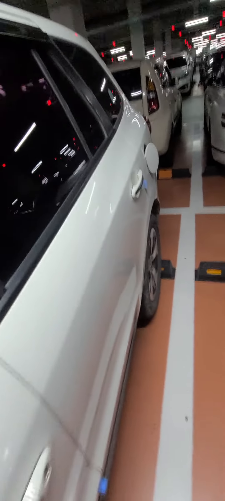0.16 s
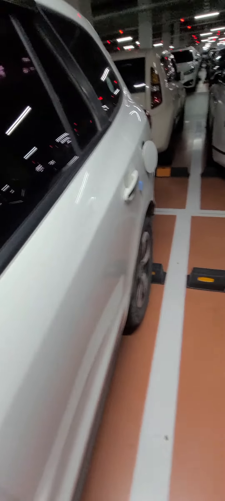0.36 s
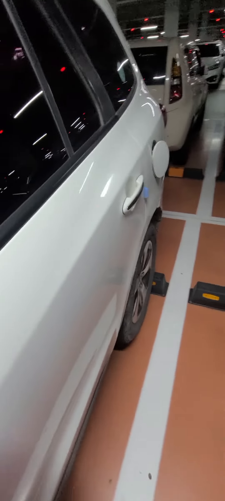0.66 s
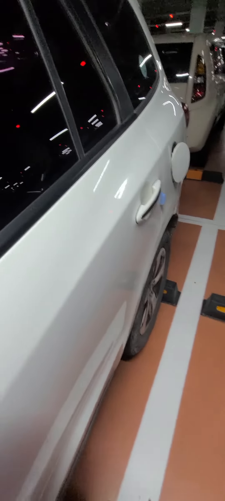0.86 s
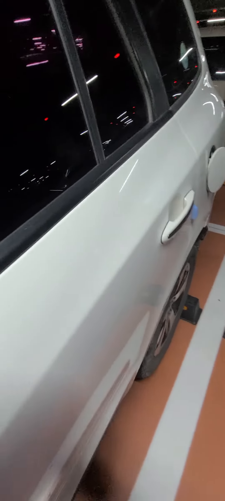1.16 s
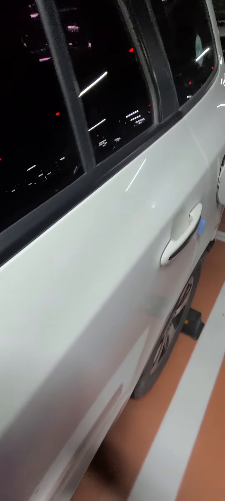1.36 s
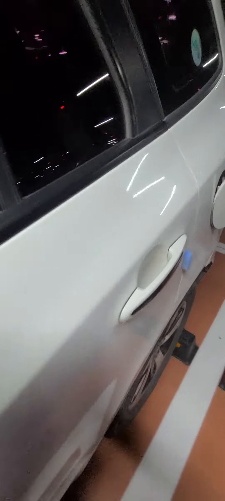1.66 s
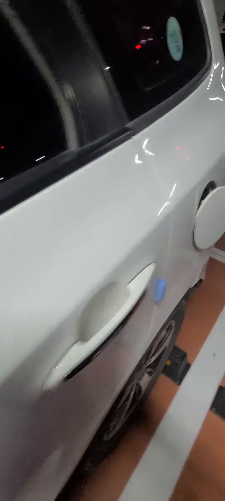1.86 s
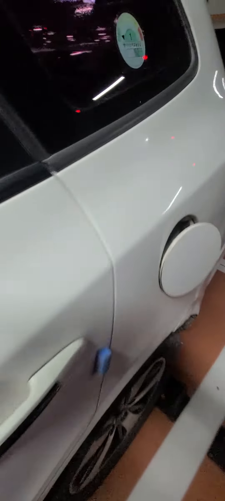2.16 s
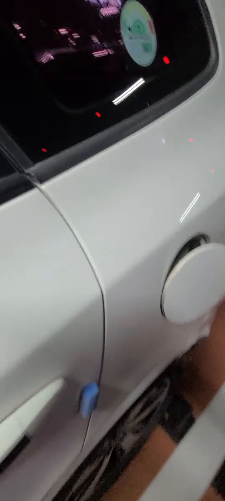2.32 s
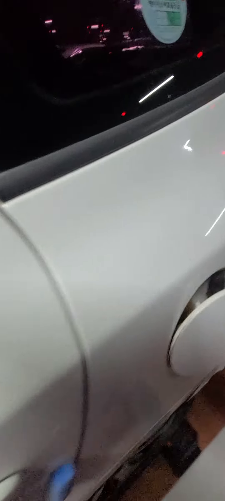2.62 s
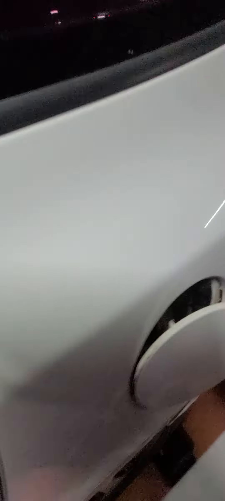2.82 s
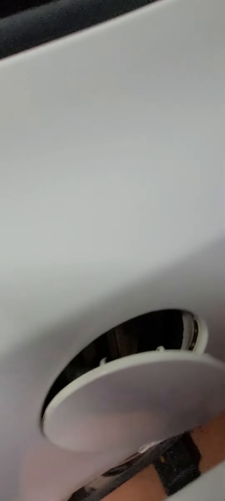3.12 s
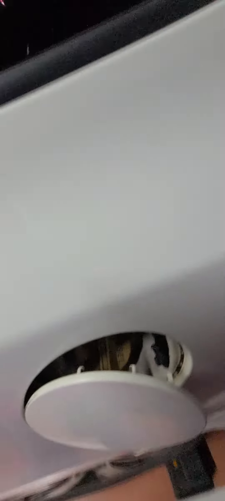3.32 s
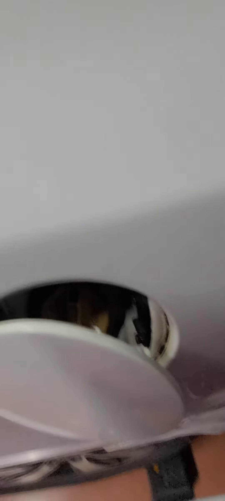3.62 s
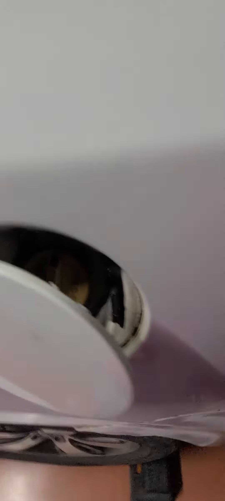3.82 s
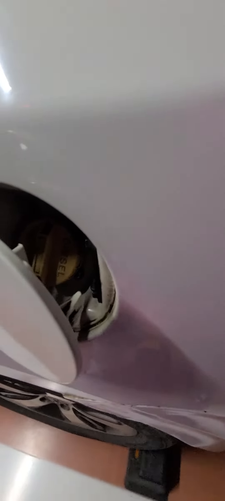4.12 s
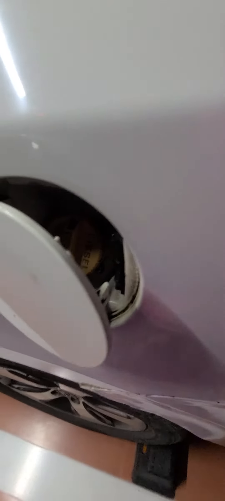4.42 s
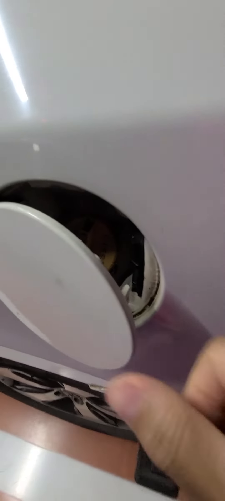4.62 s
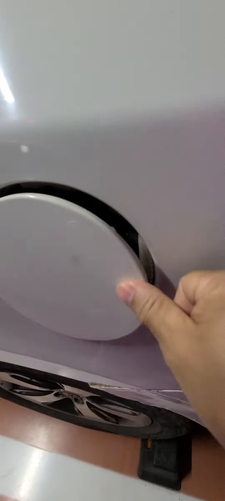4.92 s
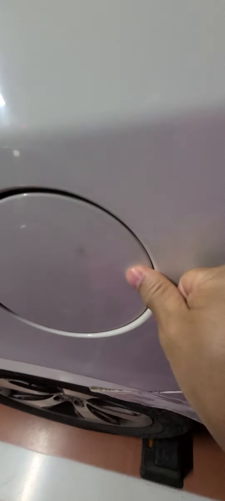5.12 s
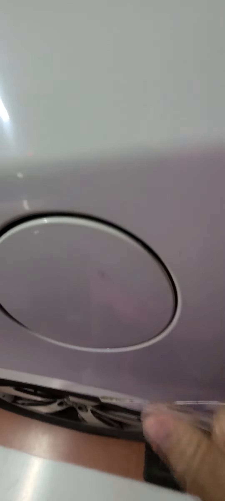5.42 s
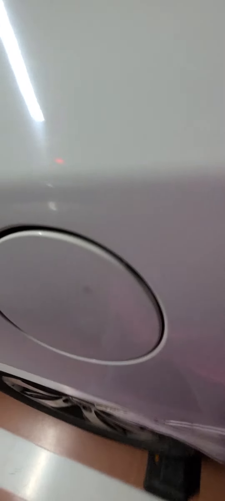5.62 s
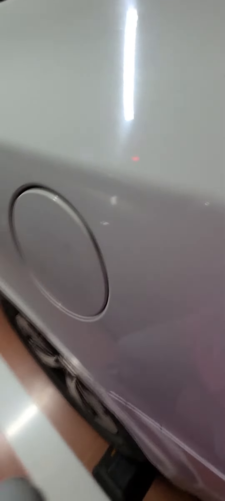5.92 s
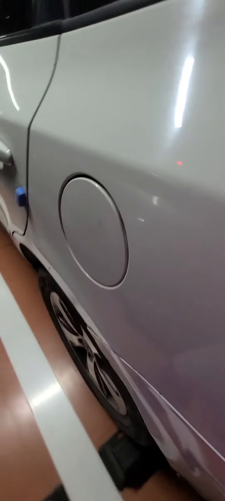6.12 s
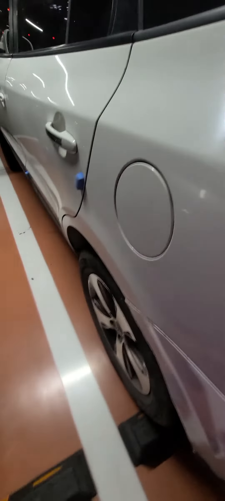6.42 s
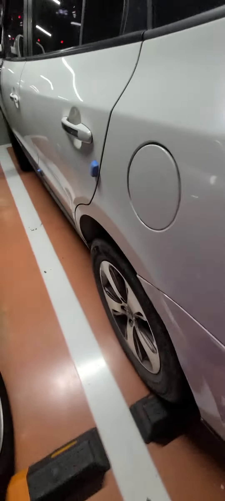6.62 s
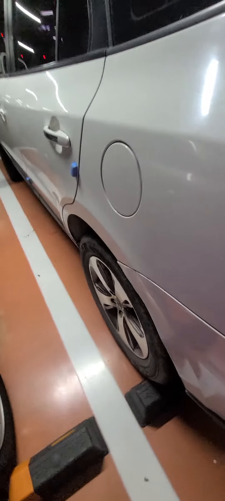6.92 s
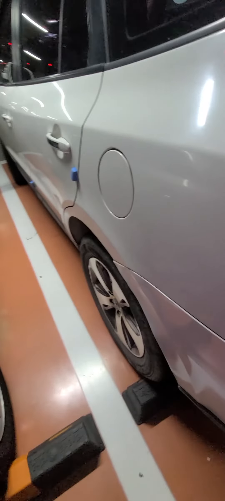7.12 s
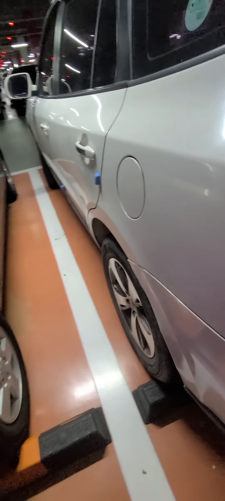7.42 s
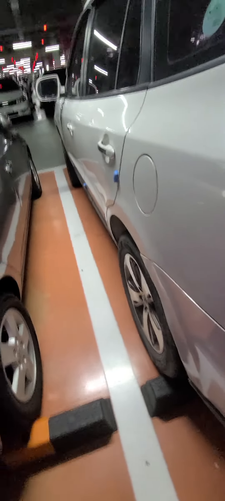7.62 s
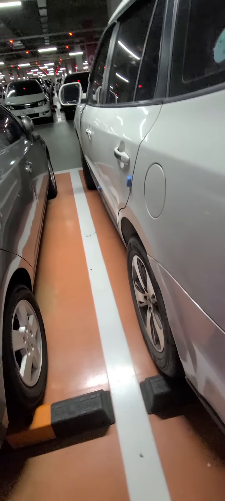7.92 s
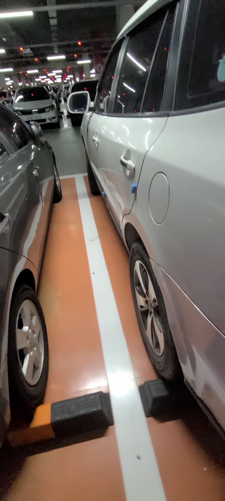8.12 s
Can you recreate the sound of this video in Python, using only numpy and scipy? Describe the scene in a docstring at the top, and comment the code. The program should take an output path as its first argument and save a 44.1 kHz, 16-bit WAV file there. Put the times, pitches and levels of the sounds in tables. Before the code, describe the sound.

In a concrete parking garage with a faint ventilation hum, someone moves beside a car, their jacket rubbing and crackling in irregular strokes near the microphone. The car's body is bumped twice with loud, hollow knocks. A fuel flap is then pushed closed with a sharp double clack, followed by a short shoe squeak, lighter swishes and a soft footfall, with dull handling thuds throughout.

```python
"""Edging along a parked car

A jacket swishes by sliding friction and crinkles as its creases buckle, close to a handheld camera.
Two bumps excite the modes of the car's side panel; a thumb snaps the fuel flap shut and lets it spring
back, and a rubber sole hoots. Ventilation hums; handling, footfalls and the panel add low thuds. The
concrete garage reverberates, and a limiter flattens the loudest knocks."""
import sys
import numpy as np
from scipy import signal
from scipy.fft import rfft, irfft, next_fast_len
from scipy.io import wavfile
from scipy.ndimage import uniform_filter1d, minimum_filter1d, map_coordinates

SR = 44100
rng = np.random.default_rng(int(sys.argv[2]) if len(sys.argv) > 2 else 0)


def waveform_to_disk(signal):
    """Save audio, clipped to [-1, 1], as 16-bit WAV at the path in sys.argv[1]."""
    frames = np.transpose(np.atleast_2d(signal))
    scaled = np.clip(frames, -1, 1) * 32767
    samples = np.round(scaled).astype(np.int16)
    wavfile.write(sys.argv[1], SR, samples)


N = 364266

# Levels in the tables are relative; a positive right bias favours the right channel.
# jacket sliding on itself: (time at full speed [s], hold [s], level [dB], rise [s], fall [s],
# fizz over swish [dB])
STROKES = [(0.0, 0.01, -52.5, .2, 0.24, -16.5), (0.47, 0.15, -52, .25, 0.093, -14),
           (0.988, .06, -40, 0.14, 0.18, -16.5), (1.27, .11, -42.5, .22, .17, -17),
           (1.922, .13, -42.5, .28, .25, -13), (2.364, 0.26, -50.5, .15, .3, -13),
           (2.713, .02, -47, .2, 0.098, -11), (2.873, .05, -48, 0.16, .35, -9.5),
           (3.215, .1, -42.5, .34, .2, -7.5), (3.741, .25, -47.5, 0.55, 0.39, -8),
           (4.423, .11, -57, 0.21, .16, -8.5), (4.796, 0.015, -60.5, .07, 0.11, -11.5),
           (5.126, .1, -62, .12, 0.09, -12), (5.489, .21, -57, 0.28, 0.33, -7),
           (5.81, 0.14, -48.5, 0.14, .07, -8.5), (6.238, .04, -42.5, .24, .32, -10.5),
           (6.595, 0.1, -50.5, .2, .3, -9), (6.907, .14, -59, .3, 0.073, -4.5),
           (7.414, 0.29, -56, .45, .25, -12), (8.09, .03, -52.5, 0.16, .24, -13.5)]
# ribbed cloth rasping: (time at full speed [s], hold [s], level [dB], rise [s], fall [s])
RASPS = [(0.467, 0.014, -42.5, 0.12, 0.22), (1.981, .125, -39, 0.12, .06), (3.256, .07, -39, 0.09, .14),
         (6.616, 0.059, -55.5, .08, 0.17)]
# heavy, hollow drags of the sleeve: (time at full speed [s], hold [s], level [dB], rise [s], fall [s])
DRAGS = [(1.065, 0.15, -51.5, .16, 0.16), (1.896, .03, -58.5, .3, 0.52), (7.2, 0.0198, -65, .08, 0.198)]
# the weave whistling, one list a stroke: (time [s], pitch [Hz], level [dB])
WHISTLES = [
    [(0.535, 1063, -61), (0.565, 1198, -33), (0.585, 1270, -48), (0.6, 1290, -57)],
    [(3.07, 11990, -65), (3.15, 12890, -57), (3.22, 14700, -52), (3.25, 14460, -57)],
    [(3.29, 4410, -42), (3.31, 5845, -36.5), (3.328, 6850, -41), (3.345, 6760, -71)],
    [(6.79, 6390, -58), (6.798, 6550, -37.5), (6.81, 6500, -65)],
    [(8.14, 7140, -67), (8.19, 6900, -61), (8.22, 7100, -60), (8.26, 6700, -69)],
]
# creases popping, with a soft footfall and a faint shoe squeak near the end:
# (time [s], knock [dB], crack [dB], resonance [Hz], right bias [dB])
POPS = [(0.1526, -40, -46, 2840, 3.5), (0.3853, -42.5, -43.5, 2780, 5.5), (0.513, -45.5, -41.5, 1990, 25),
        (1.2049, -40, -53, 1177, 13.5), (1.2392, -44, -42, 6800, 15), (1.3784, -32.5, -38, 1350, 15),
        (1.461, -41.5, -38.5, 3180, 12), (1.5566, -41.5, -40.5, 1950, 13), (1.6726, -44.5, -39, 3260, 9.5),
        (1.7581, -28, -30.5, 1296, 6.5), (1.8013, -32.5, -52, 1010, 7), (1.8393, -34.5, -32.5, 3460, 8.5),
        (1.8793, -33, -44.5, 897, 11.5), (1.9024, -29.5, -13.5, 3460, 3), (1.9093, -29, -40.5, 1330, 8.5),
        (2.3422, -36.5, -48, 970, 11.5), (2.3711, -29.5, -20, 3120, 6), (2.3748, -27, -18, 2083, 5),
        (2.4479, -27, -32, 3266, 7.5), (2.463, -34, -55, 916, 1.5), (2.6423, -37.5, -42, 1250, 9),
        (2.7195, -33, -42, 1180, 13), (2.7441, -35, -35.5, 1479, 9), (2.8769, -48.5, -34, 2728, 5.5),
        (2.8821, -34, -33.5, 2760, 9), (2.8947, -44, -31.5, 2800, 16.5), (2.9165, -32, -44, 1200, 0),
        (2.9223, -23, -20, 3106, 10.5), (3.0364, -37.5, -48.5, 1575, 10),
        (3.0928, -31.5, -39.5, 1310, 14.5), (3.122, -36.5, -40.5, 1240, 7), (3.3545, -33, -31.5, 2900, 5),
        (3.372, -25.5, -26.5, 1925, 16.5), (3.3864, -30, -22, 4800, 1.5), (3.3955, -40, -22.5, 1680, 29),
        (3.5022, -27, -25, 1520, 2), (3.514, -32.5, -29, 4335, 0.5), (4.0406, -34, -43.5, 1603, 11),
        (4.1141, -43, -47.5, 1730, 8.5), (6.5063, -47.5, -54.5, 7160, 11), (6.7418, -69, -51, 6420, 4),
        (6.7969, -60, -51.5, 6900, 1), (7.0255, -54.5, -70, 2696, 7), (7.1502, -47.5, -49.5, 1406, 14),
        (7.1873, -52.5, -63, 993, 0), (7.6854, -43, -38.5, 5200, 12), (7.7442, -32.5, -33, 1210, 11),
        (7.8365, -52, -56.5, 1475, 10), (7.9641, -53, -58, 1395, 5)]
# low thuds from handling, footfalls and the bumped car panel: (time [s], level [dB])
THUDS = [(0.1, -63), (1.24, -50.5), (1.77, -52), (1.91, -50), (2.45, -60), (2.72, -50.5), (2.92, -46),
         (3.1, -38.5), (3.37, -45.5), (3.51, -46.5), (4.04, -50), (4.37, -47.5), (5.17, -43.5),
         (5.39, -48.5), (5.94, -53), (6.51, -62), (7.18, -54), (7.68, -61)]
# side panel modes: (frequency [Hz], t60 [s], level at first spot [dB], level at second spot [dB])
PANEL_MODES = [(79, 0.19, -37, -36.5), (108, 0.25, -32, -28), (126, 0.28, -25.5, -21.5),
               (174, 0.31, -28.5, -23.5), (228.4, 0.28, -22, -22.5), (269.2, 0.17, -15, -19.5),
               (313.5, 0.22, -9.5, -11), (339, 0.062, -5, -4), (401, 0.11, -15, -9.5),
               (432, 0.13, -12.5, -7.5), (472, 0.2, -7.5, -2.5), (502, 0.084, -11.5, -10),
               (532, 0.19, -12, -18.5), (643, 0.039, -20, -32), (753, 0.081, -21, -36),
               (856, 0.084, -28, -26)]
# blows on the panel, one list a spot: (time [s], strength [dB], t60 factor [1], cut-off [Hz])
PANEL_BUMPS = [
    [(3.587, 4, 0.89, 3000)],
    [(4.2735, -16, 0.97, 2940), (4.2845, 2, 1, 3000)],
]
# hard contacts on panel and catch: (time [s], knock [dB], crack [dB], resonance [Hz], right bias [dB])
CONTACTS = [(3.579, -20.5, -21.5, 3060, 7.5), (3.5835, -27, -19, 1450, 2), (3.5895, -18.5, -22, 2950, 3),
            (3.6414, -23.5, -19, 2153, 7), (4.2726, -30.5, -39.5, 2942, -1), (4.2845, -37, -30.5, 6630, -1),
            (4.3012, -37, -33, 3130, 0.5), (4.314, -39.5, -42, 3080, 5), (4.8318, -49.5, -66, 2462, 6),
            (4.9255, -51, -48, 1800, 3), (4.9593, -42, -58, 1740, 9.5), (5.0374, -24, -32, 3600, 1),
            (5.0433, -29, -39.5, 1360, 1.5), (5.158, -28.5, -41, 3700, 2),
            (5.1662, -12.5, -30.5, 1150, -0.5), (5.175, -18.5, -31, 3870, 0), (5.3629, -55, -49, 1420, -1)]
# fuel flap modes: (frequency [Hz], t60 [s], level at catch [dB], level at spring stop [dB])
FLAP_MODES = [(125, 0.3, -30, -28), (185.2, 0.42, -27, -26.5), (218, 0.21, -27.5, -28),
              (262, 0.16, -16, -32.5), (306.4, 0.2, -15.5, -29.5), (383, 0.12, -10.5, -35.5),
              (421.5, 0.33, -14, -21.5), (453.7, 0.22, -17, -8), (510, 0.071, -6, -18),
              (571, 0.028, -5, -15), (631, 0.1, -14.5, -19), (704, 0.15, -12.5, -44),
              (841, 0.048, -10, -36.5), (1130, 0.042, -24.5, -25), (1312, 0.11, -22, -51),
              (1440, 0.13, -25, -37), (1680, 0.16, -24.5, -39)]
# blows at the catch, then at the stop: (time [s], strength [dB], t60 factor [1], cut-off [Hz])
FLAP_PUSHES = [
    [(5.038, -14.5, 0.8, 490), (5.129, -18.5, 0.94, 448), (5.166, 2, 0.8, 2455)],
    [(5.336, -15, 0.76, 600), (5.366, -0.5, 0.42, 1266)],
]
# rubber sole modes: (frequency [Hz], t60 [s], level [dB])
SOLE_MODES = [(327, 0.096, -12.5), (647, 0.045, -18)]
# its scuff on the painted floor: (time [s], strength [dB], t60 factor [1], cut-off [Hz])
SOLE_SCUFFS = [
    [(6.139, 0.0033, 0.98, 2030)],
]
# spectral envelopes of the noises: (frequency [Hz], level [dB])
SWISH_SPECTRUM = [(120, -42), (200, -12), (418, -6), (505, -5.5), (649, -7.5), (783, -3), (888, -7.5),
                  (1200, -1), (1540, -3), (1740, -1), (1980, -5.5), (3160, -1.5), (4070, -7), (6930, -7.5),
                  (8500, -25.5), (11000, -47.5), (18700, -120)]
FIZZ_SPECTRUM = [(6000, -47), (7800, -1), (9500, -1), (11200, 1), (13000, -1), (15000, -5.5), (16500, -4.5)]
VENTILATION_SPECTRUM = [(15, -33), (25, 3.5), (97, -6), (229, -4.5), (624, -10.5), (695, -12),
                        (1040, -16.5), (1260, -18.5), (1840, -23), (2990, -19.5), (5140, -29),
                        (6380, -10.5), (8140, -27), (12500, -29), (16000, -34)]
RUMBLE_SPECTRUM = [(15, -14), (40, -7.5), (80, 3.5), (130, -8), (250, -16.5), (600, -52.5)]
POP_SPECTRUM = [(50, 19), (110, 18.5), (210, 6), (430, 13), (720, 6), (1200, 9), (2000, 4.5), (3300, 3.5),
                (4500, 1.5), (5500, -10.5), (7000, -3), (8300, -21), (12000, -19), (16000, -26.5)]
CLICK_SPECTRUM = [(50, 20.5), (2000, 0.5), (3300, -3), (5200, -8.5), (7200, -7), (8300, -11.5),
                  (9800, -12.5), (12000, -20), (16000, -25.5)]
# likeness of left and right: (frequency [Hz], coherence [1])
AIR_COHERENCE = [(60, 0.63), (300, 1), (900, 0.22), (2500, 0.091), (12000, 0.042)]
CLOTH_COHERENCE = [(200, .8), (1000, 0.45), (4000, 0.1), (14000, 0.37)]
# reverberation time of the garage: (frequency [Hz], t60 [s])
HALL_T60 = [(100, 1.8), (450, 0.96), (1500, 0.61), (5000, 0.21), (14000, 0.3)]
# thud, knock, crack and tick bands of a snap: (lower edge [Hz], upper edge [Hz])
SNAP_BANDS = [(50, 250), (250, 1200), (1200, 4500), (4500, 16000)]

TOP_HZ = 16100


def amp(db):
    """Amplitude ratio of a level in decibels."""
    return 10 ** (np.asarray(db) / 20)


def unit(x):
    """Normalisation to rms 1."""
    return x / np.sqrt(np.mean(x ** 2) + 1e-20)


def along(points, hz):
    """Interpolation on a logarithmic frequency axis."""
    knots_hz, values = np.transpose(points)
    return np.interp(np.log(hz + 1), np.log(knots_hz + 1), values)


def wobble(rate):
    """Smooth random modulation, with rate knots a second."""
    return map_coordinates(rng.standard_normal(int(N * rate / SR) + 4), [np.arange(N) * rate / SR])


def filtered(x, response):
    """Linear filtering: the spectrum is multiplied by a frequency response."""
    n = x.shape[-1]
    padded = next_fast_len(n + 8192)
    return irfft(rfft(x, padded) * response(np.fft.rfftfreq(padded, 1 / SR)), padded)[..., :n]


def add(track, start_s, sound):
    """Superposition of a sound on a track."""
    part = track[..., max(round(start_s * SR), 0):][..., :sound.shape[-1]]
    part += sound[..., :part.shape[-1]]


def together(gains):
    """Incoherent sources add in power."""
    return np.sqrt(sum(gain ** 2 for gain in gains))


def stereo_noise(spectrum, coherence):
    """Partially coherent noise of rms 1: the ratio of mid to side sets the coherence."""
    angle = lambda hz: np.arccos(np.clip(along(coherence, hz), -1, 1)) / 2
    shape = lambda hz: amp(along(spectrum, hz)) * [np.cos(angle(hz)), np.sin(angle(hz))]
    mid, side = filtered(rng.standard_normal((2, N)), shape)
    return unit(np.array([mid + side, mid - side]))


def narrow_band(centre_hz, width_hz):
    """Quadrature modulation shifts low-pass noise to a fixed or moving centre."""
    skirt = [(width_hz / 4, 0), (width_hz / 2, -3), (width_hz * 2, -22), (width_hz * 10, -70)]
    in_phase, quadrature = (stereo_noise(skirt, coherence=[(100, 0.23)]) for _ in range(2))
    phase = 2 * np.pi * np.cumsum(np.broadcast_to(centre_hz, N)) / SR
    return in_phase * np.cos(phase) + quadrature * np.sin(phase)


def placed(x, lag_ms, right_db):
    """Time and level differences: a source on the right reaches the left channel later and weaker."""
    side = np.array([[-1], [1]])
    delay = lambda hz: np.exp(1j * np.pi * hz * lag_ms / 1000 * side)
    return filtered(x, delay) * amp(right_db / 2 * side)


def swell(time, hold, db, rise, fall):
    """Friction noise grows as speed to the power 1.5, holds, then loses 20 dB per fall time."""
    t = np.arange(N) / SR - time
    speed = np.clip(1 + t / rise, 0, 1)
    fading = np.clip((t - hold) / fall, 0, 10)
    return speed ** 1.5 * amp(db - 20 * fading)


def snaps(rows, spectrum, bands, t60s, tick_db, tail_db, tail_t60, spread, ring_db, upper_db, lead_db):
    """Sudden release: a brief slide, then a noise burst with two resonances, its low bands dying last."""
    out = np.zeros((2, N))
    t = np.arange(4096) / SR - 0.012
    after = np.maximum(t, 0)
    times, knock, crack, ring_hz, right_bias = np.transpose(rows)
    thud = knock - 16
    tick = crack + tick_db + 0.0036 * ring_hz  # the higher it rings, the sharper it is
    levels = [thud, knock, crack, tick][-len(bands):]
    peak = lambda hz: 1 / (1 + ((hz / ring_hz[:, None, None, None] - 1) / 0.1) ** 2)
    colour = lambda hz: amp(along(spectrum, hz) + ring_db * peak(hz) + upper_db * peak(hz / 1.45))
    noise = rng.standard_normal((len(rows), len(bands), 3, len(t)))  # left, right, common
    slips = amp(3.3 * rng.standard_normal((len(rows), 1, 1, len(t))))  # a few micro-slips stand out
    noise = filtered(slips * (noise[:, :, :2] * spread + noise[:, :, 2:]), colour)
    slide = amp(lead_db - 60 * np.abs(t) / 0.055)
    onset = 1 - np.exp(-after / 0.00039)
    tail = amp(tail_db - 60 * after / tail_t60)
    for k, (band, t60) in enumerate(zip(bands, t60s)):
        envelope = (amp(-60 * after / t60) + tail) * onset + slide
        bandpass = signal.butter(2, band, "band", fs=SR, output="sos")
        bursts = signal.sosfilt(bandpass, noise[:, k] * envelope)
        for time, db, right_db, burst in zip(times, levels[k], right_bias, bursts):
            balance = unit(amp([[0], [right_db]]))
            rms = np.sqrt(np.sum(burst ** 2) / (2 * 0.01 * SR))  # energy referred to 10 ms
            add(out, time + t[0], amp(db) * balance * burst / rms)
    return out


def struck(modes, blows, attack_s, scatter_db, drift):
    """Modal superposition: the point of impact weights the damped modes; one track a point."""
    out = np.zeros((len(blows), N))
    t = np.arange(SR // 2) / SR
    hz, t60, *spots = np.transpose(modes)[:, :, None]
    polarity = (-1) ** np.arange(len(hz))[:, None]  # neighbouring modes swing in opposite senses
    onset = 1 - np.exp(-t / attack_s)
    for track, spot_db, rows in zip(out, spots, blows):
        for time, db, t60_factor, cut_hz in rows:
            # loosely held parts rattle, so their phases wander
            wander = drift * np.cumsum(rng.standard_normal((len(hz), len(t))), axis=1) / np.sqrt(SR)
            wander = uniform_filter1d(uniform_filter1d(wander, size=60, axis=1), size=45, axis=1)
            start_db = db + spot_db + scatter_db * rng.standard_normal(hz.shape)
            level = amp(start_db - 60 * t / (t60 * t60_factor))
            level /= np.sqrt(1 + (hz / cut_hz) ** 4)  # a soft contact misses the high modes
            ringing = polarity * level * np.sin(2 * np.pi * hz * t + wander)
            add(track, time, ringing.sum(axis=0) * onset)
    return out


def folds(x, depth_db):
    """Folds that open and close impose short-lived resonances on the cloth's noise."""
    spectra = signal.stft(x, nperseg=1024)[2]
    field = rng.standard_normal(spectra.shape[1:])
    field = uniform_filter1d(uniform_filter1d(field, size=5, axis=0), size=5, axis=1)
    return unit(signal.istft(spectra * amp(depth_db * unit(field)), nperseg=1024)[1][:, :N])


def cloth_friction(strokes):
    """Sliding friction radiates broadband noise; ribs and heavy drags add narrow bands."""
    fizz_gain = together(stroke * amp(row[-1]) for stroke, row in zip(strokes, STROKES))
    rasp_gain = together(swell(*row) for row in RASPS)
    drag_gain = together(swell(*row) for row in DRAGS)
    swish = together(strokes) * folds(stereo_noise(SWISH_SPECTRUM, CLOTH_COHERENCE), depth_db=3.5)
    fizz = fizz_gain * folds(stereo_noise(FIZZ_SPECTRUM, CLOTH_COHERENCE), depth_db=2.0)
    rasp = rasp_gain * folds(narrow_band(centre_hz=2012, width_hz=1050), depth_db=5.5)
    drag = drag_gain * narrow_band(centre_hz=426, width_hz=140)
    return amp(0.75) * swish + amp(-0.3) * fizz + rasp + drag


def clothing():
    """Threads catch and let go, modulating the jacket's swish; creases and shoes add transients."""
    strokes = [swell(*row[:-1]) for row in STROKES]
    grain = amp(0.8 * wobble(290) + 0.6 * wobble(30))
    cloth = grain * (cloth_friction(strokes) + weave_whistle())
    pops = creases_and_steps(together(strokes))
    return placed(cloth, lag_ms=0.42, right_db=6.0) + placed(pops, lag_ms=0.33, right_db=-1.0)


def ventilation():
    """Steady airflow fills the garage with nearly stationary noise."""
    gain = amp(-62.5 + 0.81 * wobble(1.1))
    return placed(gain * stereo_noise(VENTILATION_SPECTRUM, AIR_COHERENCE), lag_ms=0, right_db=3.0)


def low_thuds():
    """Low-frequency vibration: handling, footfalls and the bumped panel thud over the hand's tremor."""
    thuds = [swell(time, hold=0.031, db=db, rise=0.08, fall=0.083) for time, db in THUDS]
    tremor = amp(-66.5 + 4.5 * wobble(6.7))
    rumble = together(thuds + [tremor]) * stereo_noise(RUMBLE_SPECTRUM, AIR_COHERENCE)
    return placed(rumble, lag_ms=0, right_db=10.0)


def reverberation(x):
    """The diffuse field of the concrete hall decays exponentially, slowest in the bass."""
    spectrum = [(100, 0.5), (310, -3), (480, -2.5), (900, -1.0), (3000, 1.5), (14000, 3.5)]
    noise = stereo_noise(spectrum, AIR_COHERENCE)[:, :SR * 3 // 2]
    hz, t, spectra = signal.stft(noise, SR, nperseg=256)
    decay = amp(-60 * t / along(HALL_T60, hz)[:, None])
    build_up = 1 - np.exp(-t / 0.012)
    tail = signal.istft(spectra * decay * build_up, SR, nperseg=256)[1]
    return signal.fftconvolve(x, tail / np.linalg.norm(tail[0]), axes=1)[:, :N]


def creases_and_steps(swish_gain, faint_count=18):
    """Short transients: buckling creases pop, with a soft footfall and a shoe squeak near the end."""
    # faint random creases are likelier and louder while the cloth moves fast
    chance = np.cumsum(np.sqrt(swish_gain))
    onsets = np.searchsorted(chance, rng.random(faint_count) * chance[-1])
    size, pitch = rng.standard_normal((faint_count, 2)).T
    knock_db = 20 * np.log10(swish_gain[onsets]) - 6 + 2 * size
    ring_hz = 1500 * np.exp(0.35 * pitch)
    faint = [(time, db, db - 5.5, hz, 9) for time, db, hz in zip(onsets / SR, knock_db, ring_hz)]
    return snaps(POPS + faint, POP_SPECTRUM, SNAP_BANDS, t60s=[0.035, 0.031, 0.0087, 0.0078],
                 tick_db=-19.5, tail_db=-25.0, tail_t60=0.063, spread=0.65,
                 ring_db=10.0, upper_db=3, lead_db=-29)


def weave_whistle():
    """Periodic excitation: the ribs of the weave whistle at the rate at which they pass."""
    t = np.arange(N) / SR
    times, pitches, levels = np.concatenate(WHISTLES).T
    hz = np.interp(t, times, pitches) * (1 + 0.02 * wobble(300))  # the ribs pass unevenly
    octave = amp(-13) * (2 * hz < TOP_HZ) * narrow_band(2 * hz, width_hz=1200)
    inside_s = [np.minimum(t - rows[0][0], rows[-1][0] - t) for rows in WHISTLES]
    gate = sum(np.clip(margin / 0.022 + 0.5, 0, 1) for margin in inside_s)
    gain = gate * amp(np.interp(t, times, levels) - 2.0 + 2.5 * wobble(120))
    return gain * (narrow_band(hz, width_hz=270) + octave)


def contact_clicks():
    """Brief, hard contacts on the panel and in the flap's catch radiate broadband transients."""
    clicks = snaps(CONTACTS, CLICK_SPECTRUM, SNAP_BANDS[1:], t60s=[0.03, 0.018, 0.013],
                   tick_db=-20.5, tail_db=-25.5, tail_t60=0.33, spread=0.8,
                   ring_db=9.0, upper_db=-3, lead_db=-21)
    return placed(clicks, lag_ms=0.048, right_db=-2.5)


def side_panel():
    """Plate vibration: bumps at two spots excite the same bending modes in different proportions."""
    first, second = struck(PANEL_MODES, PANEL_BUMPS, attack_s=0.0015, scatter_db=1.1, drift=4.5)
    return placed(first, lag_ms=-0.04, right_db=4.5) + placed(second, lag_ms=-0.27, right_db=2.0)


def fuel_flap():
    """Impact excitation: the flap rings in its housing on meeting the catch, then the spring stop."""
    clacks = struck(FLAP_MODES, FLAP_PUSHES, attack_s=0.0012, scatter_db=1.85, drift=9.2)
    return placed(clacks.sum(axis=0), lag_ms=-0.1, right_db=3.5)


def shoe():
    """Stick-slip friction makes a rubber sole hoot briefly on the painted floor."""
    hoot = struck(SOLE_MODES, SOLE_SCUFFS, attack_s=0.09, scatter_db=1.5, drift=2.5)
    return placed(hoot, lag_ms=0, right_db=5)


def scene():
    """Direct sound, reverberant field and background noise superpose."""
    person = clothing() + shoe()
    car = side_panel() + fuel_flap() + contact_clicks()
    hall = reverberation(amp(-25.0) * person + amp(-26.0) * car)
    return person + car + hall + low_thuds() + ventilation()


def record(dry):
    """Peak limiting: the gain dips briefly around each overload; a low-pass then limits the band."""
    peak = np.abs(dry).max(axis=0)
    allowed_gain = np.minimum(1, amp(-0.4) / (peak + 1e-9))
    gain = uniform_filter1d(minimum_filter1d(allowed_gain, size=200), size=100)
    return filtered(dry * gain, lambda hz: hz < TOP_HZ)


dry = scene()
out = record(dry)
waveform_to_disk(out)
```